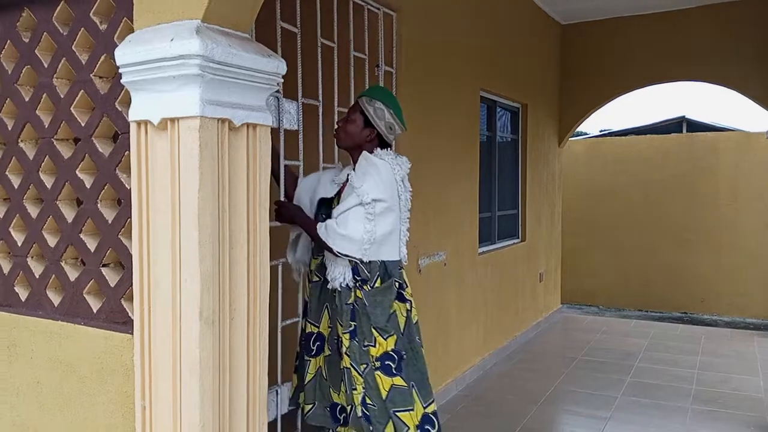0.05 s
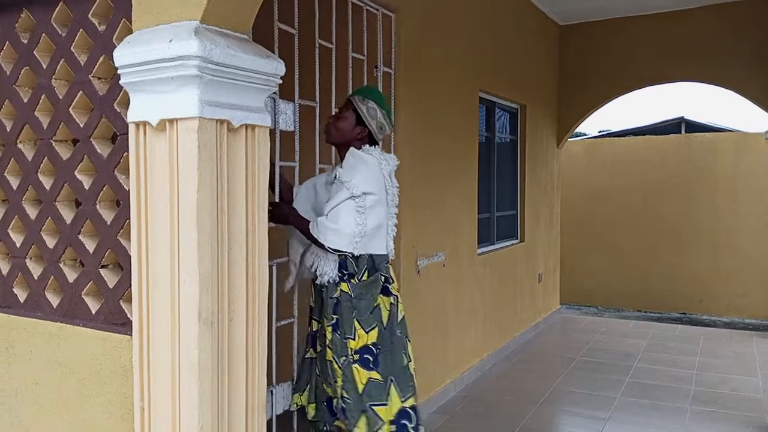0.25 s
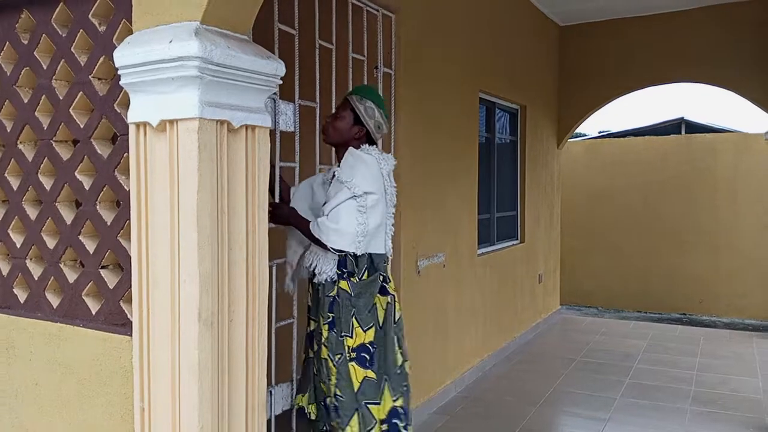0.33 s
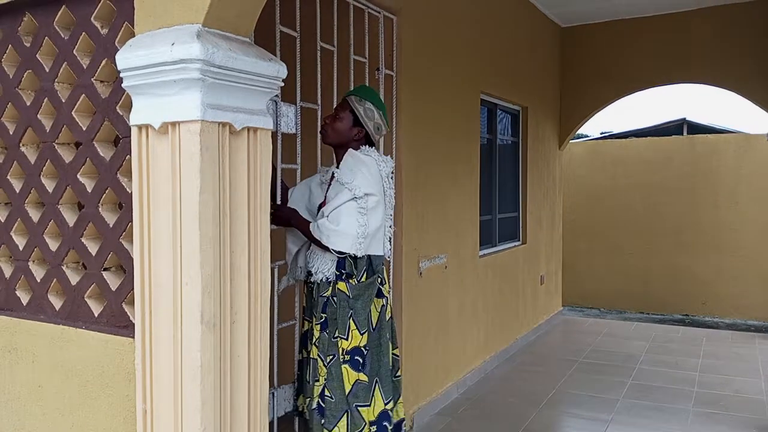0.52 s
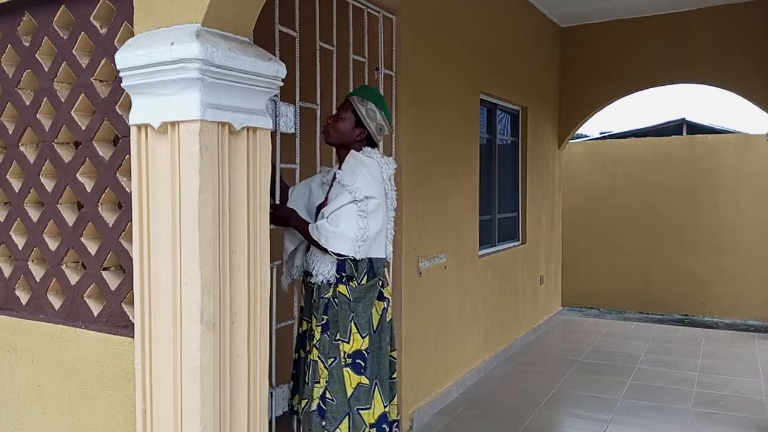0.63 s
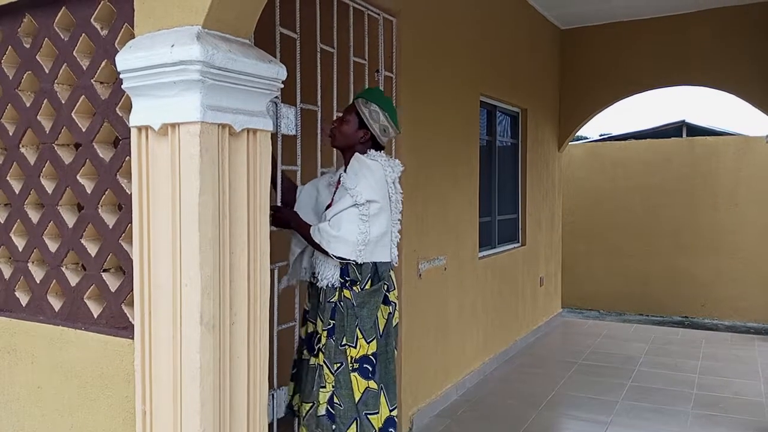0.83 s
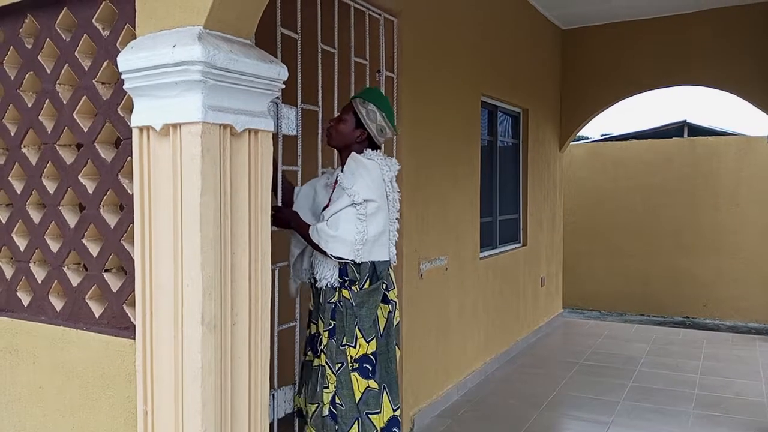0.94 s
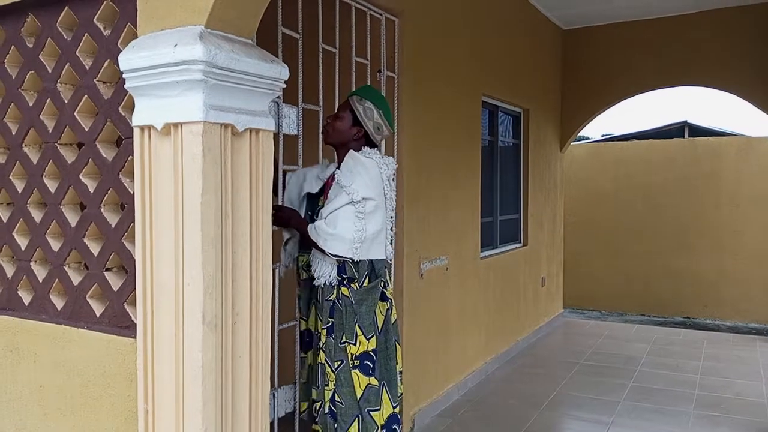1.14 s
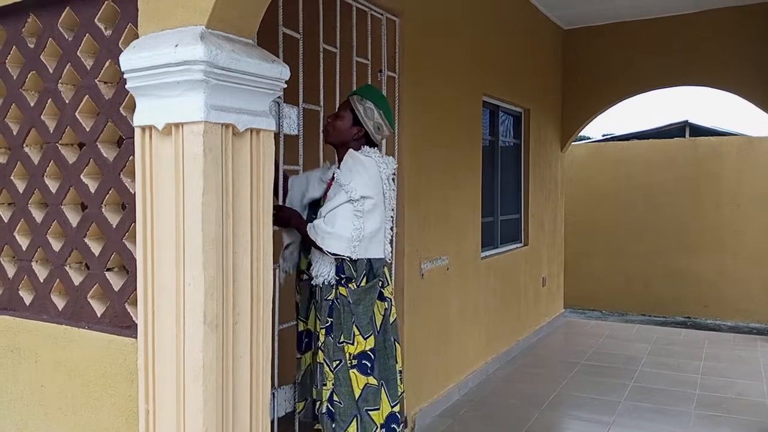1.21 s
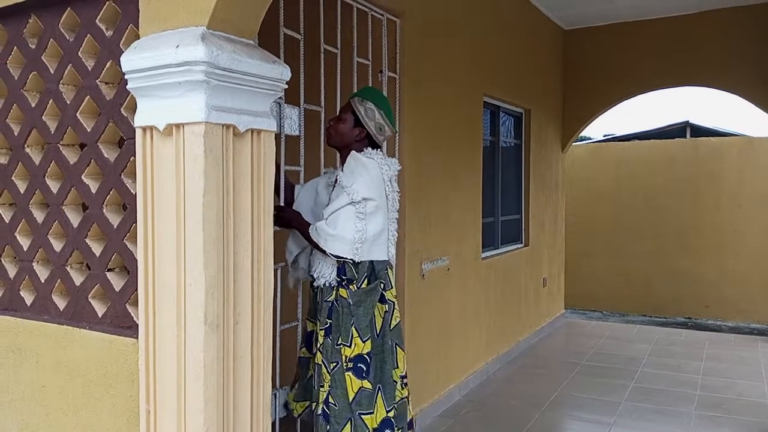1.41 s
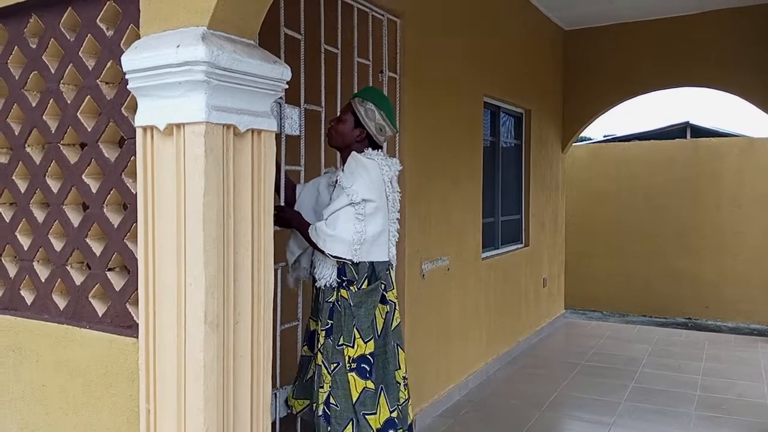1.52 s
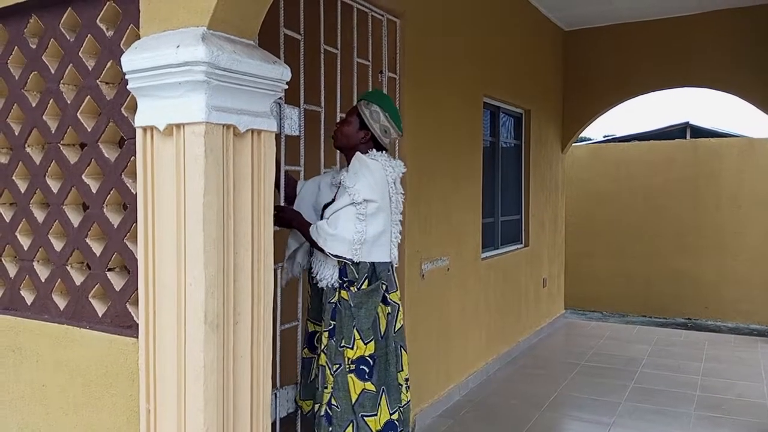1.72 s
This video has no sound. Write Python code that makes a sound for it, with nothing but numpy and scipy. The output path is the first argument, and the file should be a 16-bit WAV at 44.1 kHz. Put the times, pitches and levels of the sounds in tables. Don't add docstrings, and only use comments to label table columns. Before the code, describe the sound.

Close up on an echoing tiled porch, loose metal gate bars clatter loudly, bounce and chatter, fade to faint bolt ticks, then a dull knock, a thin squeak and one bright slam that rings away.

```python
import sys
import numpy as np
from scipy import signal
from scipy.fft import rfft, irfft, next_fast_len
from scipy.io import wavfile
from scipy.ndimage import uniform_filter1d

SR = 44100
rng = np.random.default_rng(int(sys.argv[2]) if len(sys.argv) > 2 else 0)


def generate_wav(signal):
    frames = np.transpose(np.atleast_2d(signal))
    scaled = np.clip(frames, -1, 1) * 32767
    pcm = np.round(scaled).astype(np.int16)
    wavfile.write(sys.argv[1], SR, pcm)


def decibels_to_gain(level_db):
    exponent = np.asarray(level_db, float) / 20
    return 10 ** exponent


N = 77175
SPREAD = .013


def unit(x):
    return x / np.sqrt(np.mean(x ** 2) + 1e-20)


def along(points, hz):
    f, value = np.transpose(points)
    return np.interp(np.log(hz + 1), np.log(f + 1), value)


def coloured(x, spectrum):
    m = 2 * next_fast_len(N // 2 + 4096)
    gain = decibels_to_gain(along(spectrum, np.fft.rfftfreq(m, 1 / SR)))
    cepstrum = irfft(np.log(unit(gain) + 1e-6), m)
    cepstrum[1:m // 2] *= 2
    cepstrum[m // 2 + 1:] = 0
    return irfft(rfft(x, m) * np.exp(rfft(cepstrum)), m)[:N]


def ringing(modes, spread):
    longest_s, most_cycles, buzz = .7, 4000, .004
    slowest_t60 = max(t60 for _, _, t60 in modes)
    t = np.arange(round(.7 * SR * np.clip(slowest_t60, .1, longest_s))) / SR
    draws = rng.standard_normal((len(modes), 3, 6))
    walk = np.cumsum(rng.standard_normal(SR // 2))[:len(t), None]
    ring = np.zeros(len(t))
    for (hz, db, t60), (level, detune, start) in zip(modes, draws):
        phase = 2 * np.pi * hz * (1 + spread * detune) * t[:, None] + 3 * start
        phase = phase + np.sqrt(2 * np.pi * buzz * hz / SR) * walk
        fade = decibels_to_gain(db - 60 * t / np.clip(t60, .03, min(longest_s, most_cycles / hz)))
        ring += fade * (np.sin(phase.astype(np.float32)) @ decibels_to_gain(2 * level))
    return ring / np.linalg.norm(ring)


def contacts(rows, modes, colour, low, after_db, wet_db, spread=SPREAD):
    after_s, thud_wet_db = .014, 2
    hi, lo, ring = np.zeros((3, N + SR))
    t = np.arange(SR // 8) / SR
    for s, clink_db, thud_db, length, ring_db in rows:
        length = max(length, 3e-4)
        u, k = t / length, round(s * SR)
        scrape = 2.705 * u * np.exp(-u * u)
        after = decibels_to_gain(after_db) * np.minimum(u, 1) * np.exp(-t / after_s)
        shape = scrape + after
        burst = shape * rng.standard_normal((2, len(t)))
        hi[k:k + len(t)] += decibels_to_gain(clink_db) * burst[0]
        lo[k:k + len(t)] += decibels_to_gain(thud_db) * burst[1]
        rung = decibels_to_gain(clink_db + ring_db) * np.linalg.norm(shape) * ringing(modes, spread)
        onset = np.minimum(np.arange(len(rung)) / SR / length, 1)
        ring[k:k + len(rung)] += rung * onset
    clink = coloured(hi[:N], colour) + ring[:N]
    thud = coloured(lo[:N], low)
    return np.array([clink + thud, decibels_to_gain(wet_db) * clink + decibels_to_gain(thud_wet_db) * thud])


# start in seconds, clink in dB, thud in dB, contact length in seconds,
# ring in dB over the clink.
RATTLE_HITS = [(.011, -60, -41, 0.0053, -9.5), (.032, -54.5, -45, 0.0069, -16.5),
               (.092, -60.5, -52.5, 0.0047, -25.5), (.1445, -31, -40, 0.0023, 3.5),
               (.166, -41, -47.5, 0.0044, -0.5), (.174, -24, -33.5, 0.005, -9.5),
               (.1905, -27.5, -52, 0.0096, -13.5), (.1955, -25, -44.5, 0.0055, -15),
               (.224, -29, -40.5, 0.0093, -6.5), (.245, -29, -44, 0.0028, 6.5),
               (.256, -31.5, -42.5, 0.0013, 1.5), (.272, -32, -40, 0.0049, 4)]
# pitch in Hz, level in dB, t60 in seconds.
BAR_MODES = [(2410, 6.5, 0.151), (3330, -6.5, 0.13), (4090, -4, 0.49), (4340, -9.5, 0.17), (4840, -4, 0.2),
             (5460, -8.5, .18), (5770, -1, 0.14), (6240, 0, 0.18), (6880, 2, 0.1), (7720, -2, 0.18),
             (8900, -10, .1), (9360, -9, .1), (9450, -6, .1)]
# frequency in Hz, density in dB per Hz.
BAR_CLINK = [(2060, -31.5), (3500, -4), (6090, 3), (8210, -2), (9810, -1.5), (13200, -20.5), (15100, -16),
             (16000, -5)]
# frequency in Hz, density in dB per Hz.
FRAME_THUD = [(29, -49), (52, -23), (80, -13), (251, -6.5), (465, -10), (711, -0.5), (1340, -8),
              (1630, -2.5), (5230, -18), (8000, -35), (10400, -86), (17600, -120)]


def rattle():
    return contacts(RATTLE_HITS, BAR_MODES, BAR_CLINK, FRAME_THUD, after_db=-10, wet_db=-4.5, spread=2 * SPREAD)


# start in seconds, clink in dB, thud in dB, contact length in seconds,
# ring in dB over the clink.
SETTLE_HITS = [
    (.437, -34.5, -36, 0.008, -1.5),
    (.445, -32, -49, 0.0057, -3),
    (.454, -35.5, -43, 0.0063, -1),
    (.631, -47.5, -42, 0.0077, 0.5),
    (.641, -43.5, -42.5, 0.0038, 5),
    (.675, -49, -55, 0.0058, 4.5),
    (.697, -59, -58, 0.0049, -4),
]
# pitch in Hz, level in dB, t60 in seconds.
SLAT_MODES = [(1612, 0, 0.21), (2167, 4, 0.21), (2400, 0.5, 0.29), (3610, -0.5, 0.17), (4030, -5, 0.17),
              (4640, -5, 0.15), (5300, -2, 0.24), (5450, -16, 0.16), (5660, -7, 0.17), (6130, -6, 0.31),
              (6920, -3.5, 0.2), (7900, -8.5, 0.098)]
# frequency in Hz, density in dB per Hz.
SLAT_CLINK = [(1200, -25), (2200, 10.5), (3200, -1.5), (4600, 4), (7400, -3), (8300, -7.5), (12000, -13.5),
              (16000, -23)]


def settle():
    return contacts(SETTLE_HITS, SLAT_MODES, SLAT_CLINK, FRAME_THUD, after_db=-7.5, wet_db=-13, spread=2 * SPREAD)


# start in seconds, clink in dB, thud in dB, contact length in seconds,
# ring in dB over the clink.
BOLT_HITS = [
    (.820, -76, -62, .005, -12),
    (.830, -39, -51, 0.0023, -7.5),
    (.8325, -40, -58, 0.0058, -3),
    (.841, -51, -49, 0.00082, -7),
    (.858, -58, -62.5, 0.0076, 3.5),
    (.885, -61, -70, 0.0067, 7.5),
    (.998, -92, -60, 0.0033, 7),
]
# pitch in Hz, level in dB, t60 in seconds.
BOLT_MODES = [(3736, -4.5, 0.18), (5210, 0.5, 0.21), (5770, 0, 0.14), (5943, -12, 0.095), (6900, -7, .13),
              (7000, 0, 0.13), (7350, -3, .19), (8300, -12, 0.069), (9000, 1, 0.14), (9300, -8, .12),
              (11100, -16, .14), (12000, -16, .16)]
# frequency in Hz, density in dB per Hz.
BOLT_CLINK = [(2500, -40), (3700, -3), (4500, -18), (5600, 13.5), (6400, -11), (7200, 15), (8200, -10),
              (9800, 9.5), (12500, -16), (15500, -1)]
# frequency in Hz, density in dB per Hz.
SLAM_THUD = [(50, -50.5), (100, -19), (240, -8.5), (380, -15), (720, -2), (900, -3), (1150, -8), (1550, 0),
             (2300, -4.5), (2950, -15), (5000, -64)]


def bolt_tick():
    return contacts(BOLT_HITS, BOLT_MODES, BOLT_CLINK, SLAM_THUD, after_db=-15.5, wet_db=-18)


# start in seconds, clink in dB, thud in dB, contact length in seconds,
# ring in dB over the clink.
KNOCK_HITS = [
    (1.2075, -57, -46.5, 0.005, -11),
    (1.2115, -45.5, -55, 0.0028, 2),
    (1.232, -64, -52.5, 0.013, 1),
    (1.268, -83, -61, 0.0071, -18),
    (1.31, -85, -69, 0.0066, -23.5),
]
# pitch in Hz, level in dB, t60 in seconds.
PLATE_MODES = [(4700, -11, 0.16), (5280, -5, .15), (6230, -8, 0.18), (7460, -2, 0.11), (8100, -10, 0.12),
               (9200, -1, .2), (9600, 6, 0.17), (11500, -14, .12)]
# frequency in Hz, density in dB per Hz.
PLATE_CLINK = [(2500, -35), (4700, -16.5), (6300, -15), (7500, 0), (9500, 0), (11500, -14), (13500, -35),
               (15500, -20)]
# frequency in Hz, density in dB per Hz.
PLATE_THUD = [(40, -69), (80, -19.5), (290, -1.5), (400, -7), (670, 2), (900, -12.5), (1200, -9.5),
              (2400, -16.5), (3300, -30), (6000, -60)]


def keep_knock():
    return contacts(KNOCK_HITS, PLATE_MODES, PLATE_CLINK, PLATE_THUD, after_db=-15, wet_db=-15)


# start in seconds, clink in dB, thud in dB, contact length in seconds,
# ring in dB over the clink.
SLAM_HITS = [
    (1.3812, -28, -37, 0.003, -6),
    (1.3875, -24.5, -54, 0.00072, -9),
    (1.390, -32, -44, 0.0046, -2),
    (1.402, -51, -35, 0.0077, -1),
    (1.628, -99, -66, 0.012, -12.5),
]
# pitch in Hz, level in dB, t60 in seconds.
SLAM_MODES = [(1552, -5, 0.9), (1983, -6, 0.4), (2410, -6.5, 0.4), (3655, -3, 0.42), (4560, -5.5, 0.32),
              (5220, -0.5, 0.39), (5170, -6, 0.52), (5750, -3, 0.56), (5820, -6, 0.53), (6460, -6.5, 0.45),
              (7210, 2, 0.33), (7400, -3.5, 0.38), (8382, -31, 0.21), (9020, 1, .2)]
# frequency in Hz, density in dB per Hz.
SLAM_CLINK = [(1470, -60.5), (2500, -1), (2990, -38.5), (3210, -1), (5830, 13), (6300, 3.5), (9220, 2.5),
              (10400, -6), (16000, -18.5)]


def slam():
    return contacts(SLAM_HITS, SLAM_MODES, SLAM_CLINK, SLAM_THUD, after_db=-5.5, wet_db=-2)


# time in seconds, strength in dB, brightness in dB.
SHAKE_COURSE = [(0, -51, -14), (0.018, -54, -47), (.13, -43.5, -30), (0.201, -48.5, -3),
                (0.241, -31.5, -0.5), (.3, -37.5, -1), (0.418, -45, -3.5), (0.498, -40, -8.5),
                (.62, -52.5, -12.5), (0.698, -61, -46), (0.758, -103.5, -33), (.9, -75.5, -14)]


def chatter():
    taps_per_s, spread_db = 2500, 5
    s, strength_db, bright_db = np.transpose(SHAKE_COURSE)
    t = np.arange(N) / SR
    chance, sign = rng.random((2, N))
    size = decibels_to_gain(spread_db * np.clip(rng.standard_normal(N), -2, 2))
    taps = unit((chance < taps_per_s / SR) * np.sign(sign - .5) * size)
    taps = taps + .5 * rng.standard_normal(N)
    lo = decibels_to_gain(np.interp(t, s, strength_db)) * taps
    hi = decibels_to_gain(np.interp(t, s, bright_db)) * lo
    return coloured(hi, BAR_CLINK) + coloured(lo, FRAME_THUD)


# start in seconds, pitch in Hz, level in dB, t60 in seconds.
SWINGING_BARS = [(.04, 900, -43.5, 0.56), (.092, 4440, -43, 0.071), (.146, 648, -34, 0.071),
                 (.175, 1242, -22, 0.023), (.225, 654, -32, 0.19), (.25, 830, -38, 0.17),
                 (.24, 264, -44, .5), (.27, 345, -44, .3), (.29, 161, -40, .6), (.33, 193, -46, .5),
                 (.3, 560, -40, .15), (.675, 715, -41, 0.15), (.705, 722, -45, .3), (.69, 2375, -46, 0.45),
                 (.693, 1655, -45, .17), (.677, 7400, -43, 0.03), (.85, 830, -55, 0.12),
                 (1.0, 720, -68, 0.29), (1.208, 1170, -54, .15), (1.216, 305, -53, .35),
                 (1.236, 905, -45, 0.12), (1.269, 890, -45, .2), (1.267, 680, -47, .1),
                 (1.28, 290, -52, .2), (1.312, 200, -53, .05), (1.25, 590, -53, .15),
                 (1.325, 900, -56, .12), (1.382, 724, -30, 0.071), (1.406, 775, -37.5, 0.16),
                 (1.47, 190, -57, .25), (1.49, 900, -54, .35), (1.632, 1530, -59, 0.35),
                 (1.645, 1980, -62, .35), (1.635, 2290, -63, .3)]


def dings():
    rise_s, wander_share = .0013, .01
    out, t = np.zeros(N + SR), np.arange(SR // 2) / SR
    for s, hz, db, t60 in SWINGING_BARS:
        drift = uniform_filter1d(rng.standard_normal(len(t)), size=500)
        wander = unit(uniform_filter1d(drift, size=500))
        swing = np.sin(2 * np.pi * hz * np.cumsum(1 + wander_share * wander) / SR)
        fade = decibels_to_gain(db - 60 * t / max(t60, .02)) * (1 - np.exp(-t / rise_s))
        out[round(s * SR):][:len(t)] += fade * swing
    return out[:N]


def squeak():
    hz, width_hz, peak_db, rise_db = 5900, 380, -56, 27
    from_s, to_s = 1.33, 1.381
    u = (np.arange(N) / SR - to_s) / (to_s - from_s)
    b, a = signal.iirpeak(hz, hz / width_hz, SR)
    whistle = signal.lfilter(b, a, rng.standard_normal(N))
    whistle = unit(signal.lfilter(b, a, whistle))
    swell = decibels_to_gain(peak_db + rise_db * np.clip(u, -1, 0))
    return swell * whistle * np.clip(4 * (u + 1), 0, 1) * (u < 0)


# frequency in Hz, t60 in seconds.
PORCH_DECAY = [(100, 0.86), (300, 0.44), (700, 0.31), (1800, 0.56), (4800, 0.37), (9000, 0.32),
               (15000, 0.33)]


def porch(x):
    delay_s, build_s, stretch = .003, .0028, 8192
    out = np.zeros(N + 2 * SR)
    for k in range(0, N, stretch):
        hz, t, z = signal.stft(rng.standard_normal(SR * 3 // 4), SR, nperseg=256)
        t60 = np.maximum(along(PORCH_DECAY, hz), .05)[:, None]
        tail = signal.istft(z * decibels_to_gain(-60 * t / t60), SR, nperseg=256)[1]
        tail = tail * (1 - np.exp(-np.arange(len(tail)) / SR / build_s))
        wet = signal.fftconvolve(x[k:k + stretch], tail / np.linalg.norm(tail))
        start = k + round(delay_s * SR)
        out[start:start + len(wet)] += wet
    return out[:N]


# frequency in Hz, density in dB per Hz.
AIR_COLOUR = [(18, -60.5), (30, -5.5), (194, 2), (426, -10.5), (461, -14.5), (649, 0.5), (801, -13),
              (5170, -23), (16000, -40)]


def outdoor_air():
    return decibels_to_gain(-74) * unit(coloured(rng.standard_normal(N), AIR_COLOUR))


def scene():
    hits, feed = rattle() + settle() + bolt_tick() + keep_knock() + slam()
    shake = chatter()
    tones = dings() + squeak()
    room = porch(feed + decibels_to_gain(-2) * shake + decibels_to_gain(-7) * tones)
    return (hits + shake + tones + room + outdoor_air())[None]


def band_limit(x):
    return signal.sosfilt(signal.butter(12, 17000, fs=SR, output="sos"), x)


def record(dry):
    top_hz, top_edge_hz, bottom_hz = 15950, 90, 75
    f = np.fft.rfftfreq(N, 1 / SR)
    top = 0.0045 + .5 * (1 - np.tanh((f - top_hz) / top_edge_hz))
    bottom = f ** 2 / np.hypot(f ** 2, bottom_hz ** 2)
    mix = irfft(rfft(dry) * top * bottom, N)
    return band_limit(mix)


dry = scene()
out = record(dry)
generate_wav(out)
```